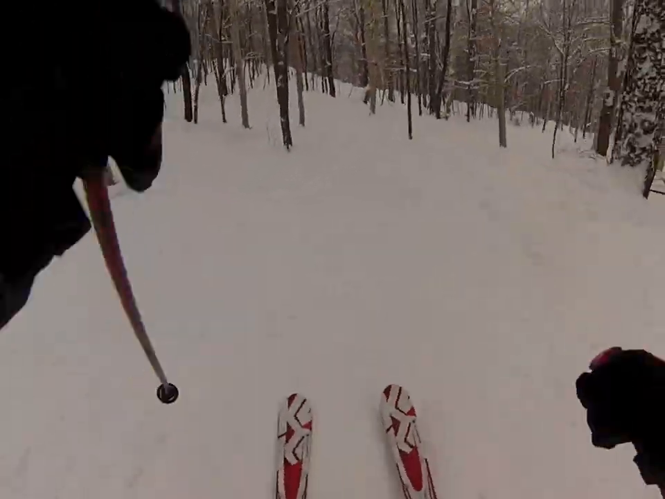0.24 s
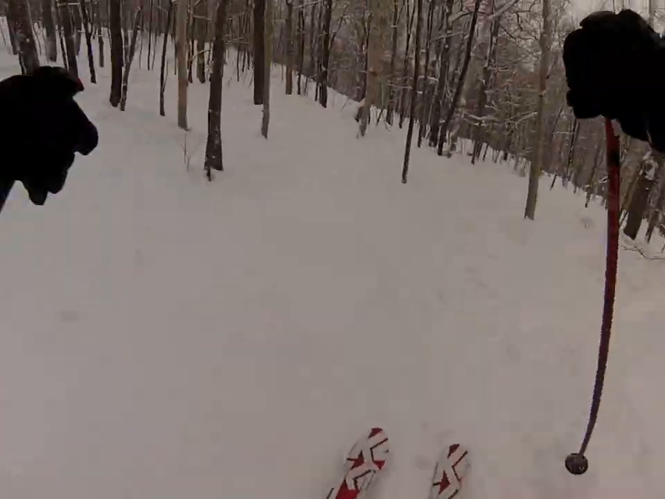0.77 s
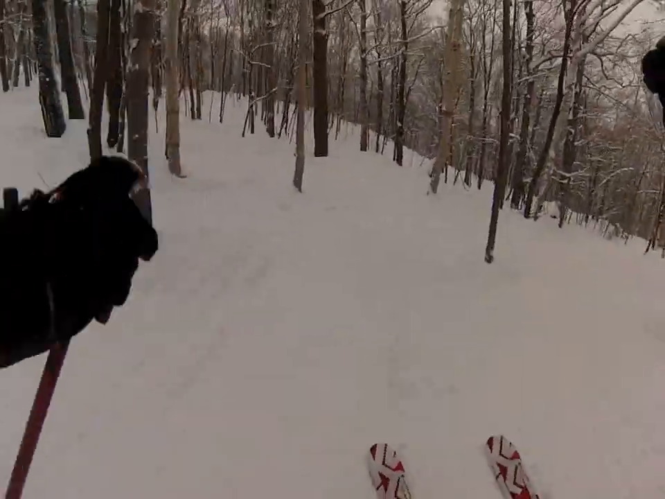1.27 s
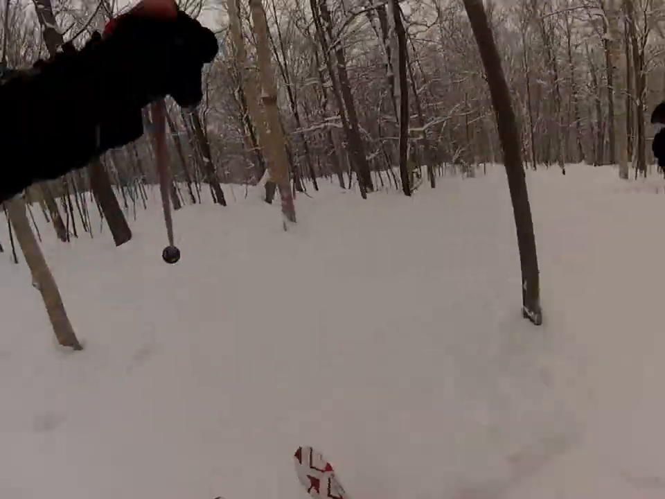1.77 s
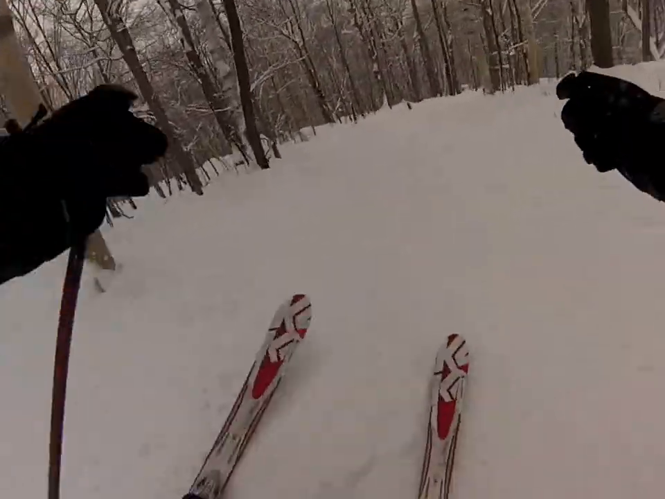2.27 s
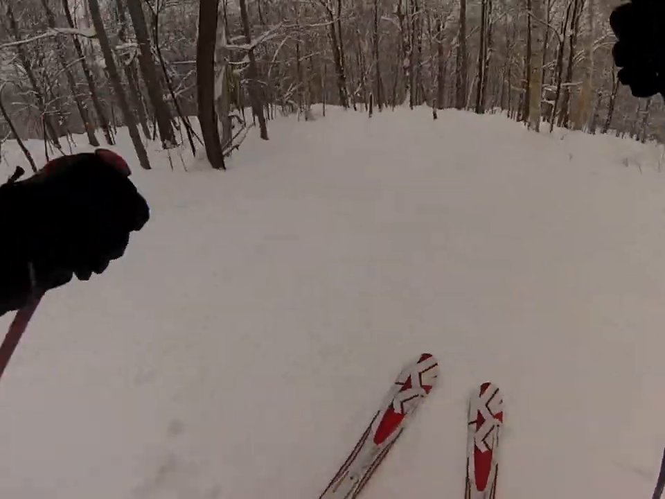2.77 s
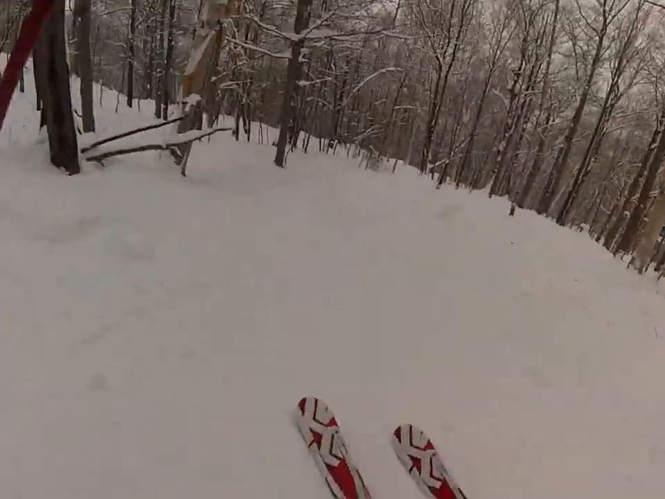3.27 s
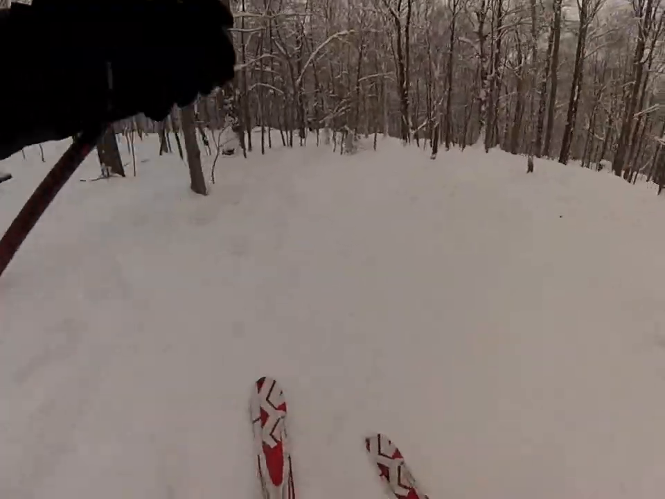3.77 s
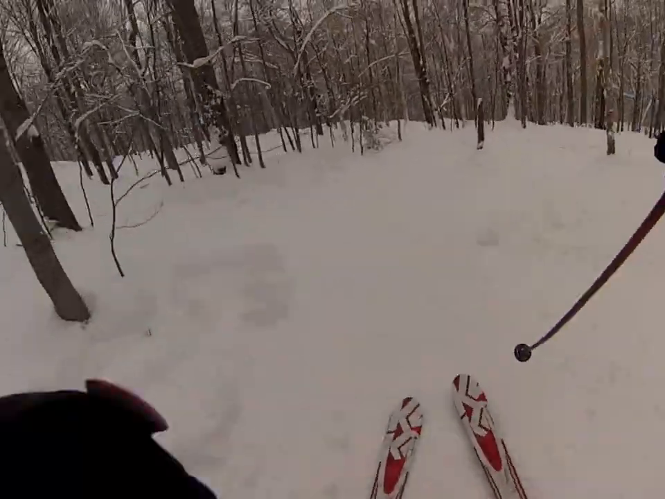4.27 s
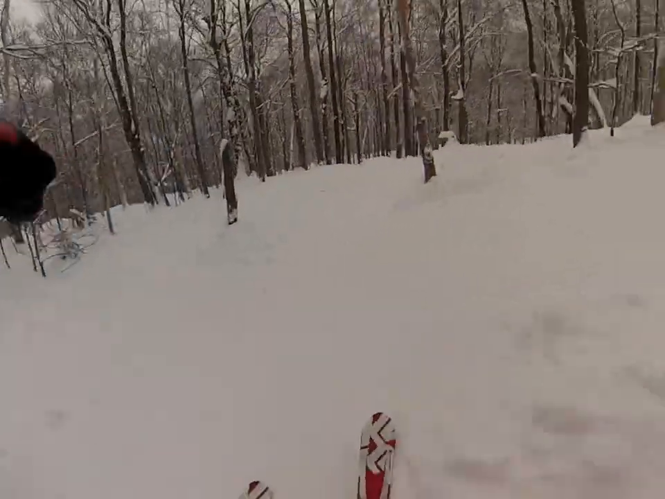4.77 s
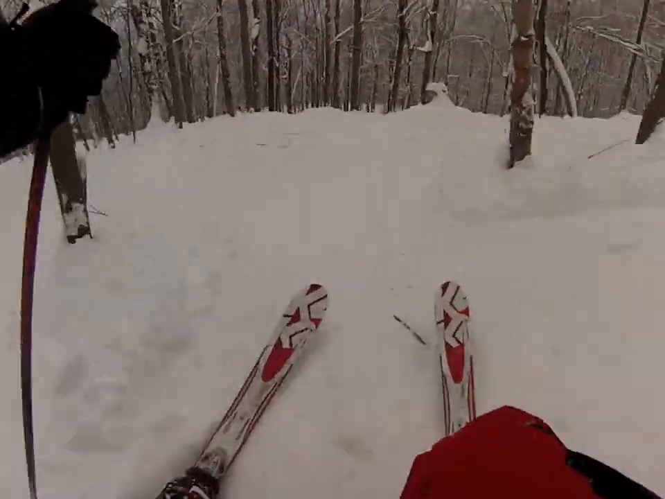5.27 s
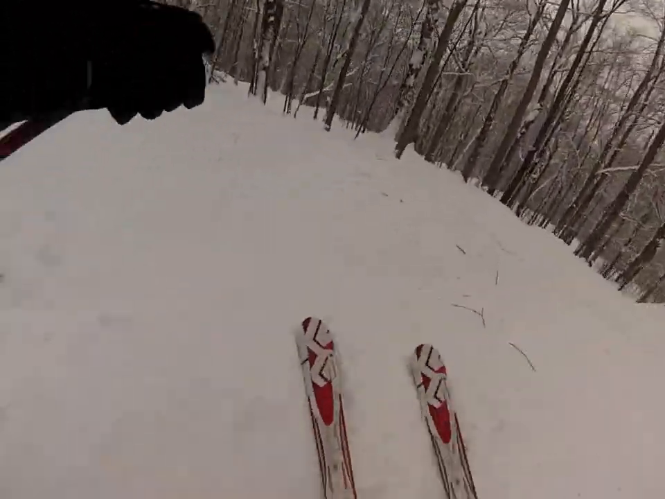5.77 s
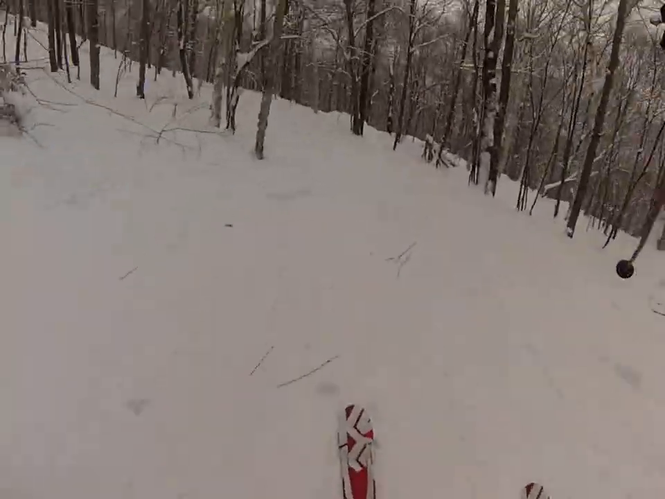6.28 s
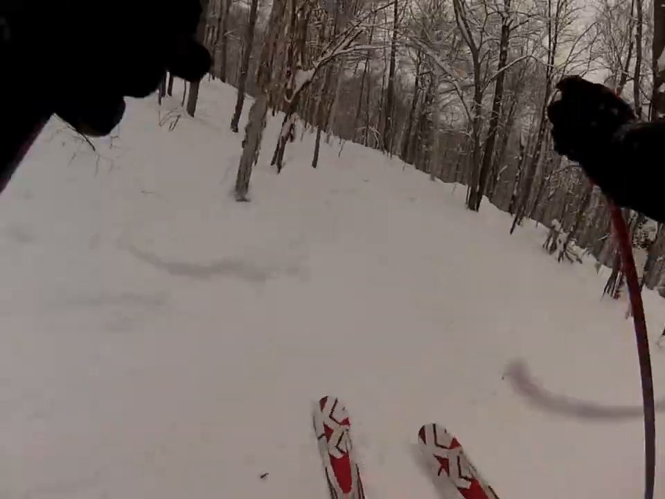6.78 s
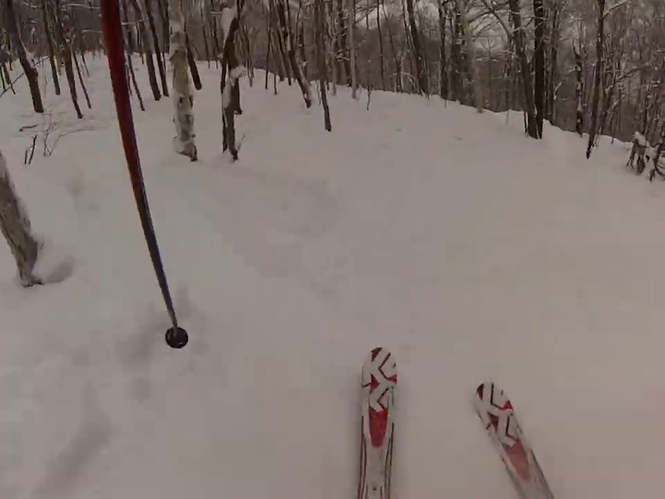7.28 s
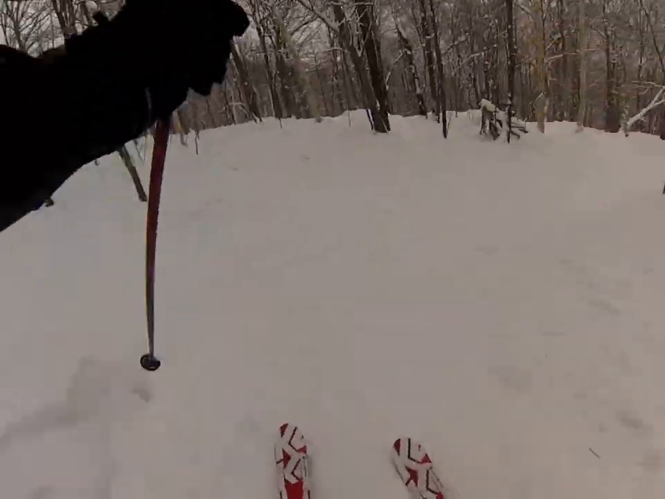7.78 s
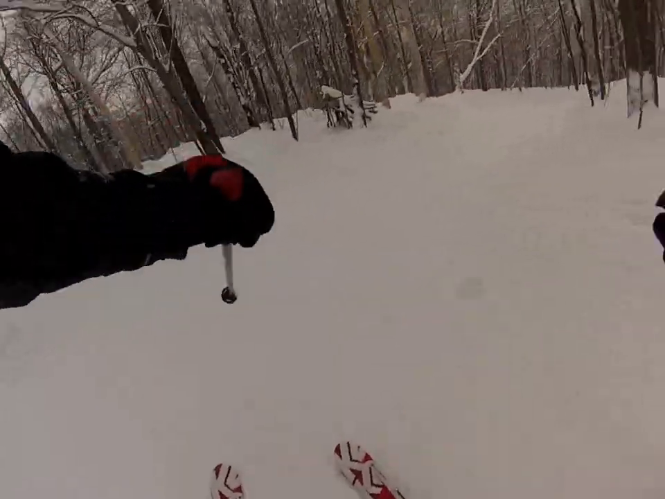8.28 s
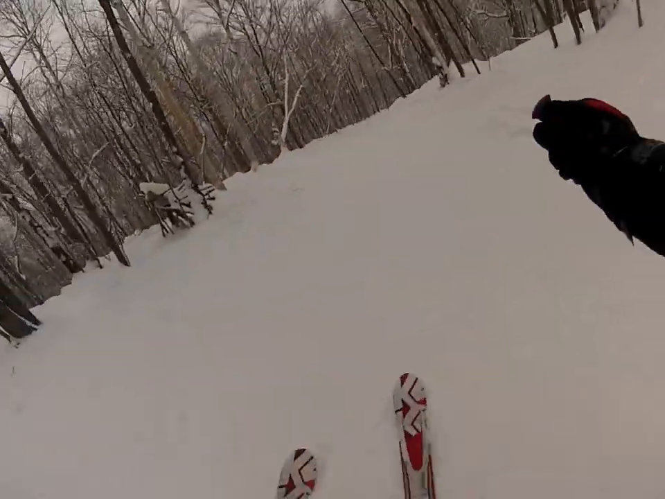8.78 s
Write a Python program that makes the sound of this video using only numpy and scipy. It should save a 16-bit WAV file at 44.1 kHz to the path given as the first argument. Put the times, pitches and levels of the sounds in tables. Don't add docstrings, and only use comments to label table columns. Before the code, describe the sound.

Skis hiss in uneven strokes through soft powder while low thumps and dull plastic knocks jolt a muffled, chest-worn microphone.

```python
import sys
import numpy as np
from scipy import signal
from scipy.fft import rfft, irfft, next_fast_len
from scipy.io import wavfile
from scipy.ndimage import uniform_filter1d, map_coordinates

SR = 44100
rng = np.random.default_rng(int(sys.argv[2]) if len(sys.argv) > 2 else 0)


def gain_from_db(level_db):
    decades = np.asarray(level_db, float) / 20
    return 10 ** decades


def bounce(signal):
    frames = np.transpose(np.atleast_2d(signal))
    limited = np.clip(frames, -1, 1)
    pcm = np.round(limited * 32767).astype(np.int16)
    wavfile.write(sys.argv[1], SR, pcm)


N = 398663


def unit(x):
    return x / np.sqrt(np.mean(x ** 2) + 1e-20)


def along(points, hz):
    f, db = np.transpose(points)
    return gain_from_db(np.interp(np.log(hz + 1), np.log(f + 1), db))


def track(rows):
    s, *columns = np.transpose(rows)
    return [np.interp(np.arange(N) / SR, s, c) for c in columns]


def wobble(rate_hz):
    knots = rng.standard_normal(int(N * rate_hz / SR) + 4)
    return map_coordinates(knots, [np.arange(N) * rate_hz / SR])


def grains(rate_hz, spread_db):
    hit = rng.random(N) < rate_hz / SR
    size = np.minimum(rng.exponential(size=N), 2)
    return unit(hit * rng.choice([-1, 1], N) * gain_from_db(spread_db * size))


def patchy(x, patchy_db):
    z = signal.stft(x, nperseg=512)[2]
    field = uniform_filter1d(rng.standard_normal(z.shape), size=6, axis=0)
    field = uniform_filter1d(field, size=8, axis=1)
    return signal.istft(z * gain_from_db(patchy_db * unit(field)), nperseg=512)[1][:N]


def filtered(x, response):
    m = next_fast_len(N + SR // 2)
    return irfft(rfft(x, m) * response(np.fft.rfftfreq(m, 1 / SR)), m)[:N]


def modes(table):
    def response(f):
        total = 0
        for k, (centre, width, db) in enumerate(table):
            damping = 1j * f * width
            total = total + (-1) ** k * gain_from_db(db) * damping / (centre ** 2 - f ** 2 + damping)
        return total
    return response


def rung(rattle, table):
    n = len(rattle)
    ring = irfft(rfft(rattle) * modes(table)(np.fft.rfftfreq(n, 1 / SR)), n)
    return ring / np.max(np.abs(ring))


def add(out, s, sound):
    at = round(s * SR)
    out[at:at + len(sound)] += sound[:N - at]


def muffled(f, edge_hz=5600):
    return 1 / (1 + 1j * f / edge_hz * 1.154 - (f / edge_hz) ** 2) ** 2


def hollow(f):
    return 1 - 0.55 / (1 + ((f - 2850) / 220) ** 2)


def through_case(f):
    return muffled(f) * hollow(f)


# mid t/s, length/s, level over pressure/dB
STROKES = [(0.117, 0.26, 8.0), (0.576, 0.34, 4.0), (0.681, 0.07, 5.5), (0.801, 0.093, 3.0),
           (0.943, 0.34, 5.5), (1.18, 0.26, 3.0), (1.4, 0.27, 7.5), (1.441, 0.05, 3.5), (1.594, 0.07, 8),
           (1.697, 0.13, 9.5), (1.891, 0.12, 4.5), (2.023, 0.34, 6), (2.028, 0.07, 3.5),
           (2.197, 0.087, 3.5), (2.317, 0.35, 2.5), (2.4, 0.34, 7.5), (2.58, 0.074, 6), (2.674, 0.05, 7),
           (2.814, 0.35, 4.0), (2.816, 0.055, 6), (3.046, 0.36, 2), (3.342, 0.34, 8.0), (3.576, 0.18, 6.5),
           (3.897, 0.091, 3), (4, 0.05, 4.0), (4.18, 0.35, 4.5), (4.198, 0.063, 6.0), (4.447, 0.15, 4),
           (4.608, 0.05, 3), (4.63, 0.31, 6.0), (4.857, 0.22, 1), (4.956, 0.13, 9.5), (5.06, 0.12, 4),
           (5.231, 0.05, 4), (5.246, 0.34, 7.0), (5.396, 0.1, 4.5), (5.582, 0.11, 4), (5.687, 0.07, 9.5),
           (5.879, 0.067, 5.0), (5.904, 0.34, 6.5), (6.097, 0.07, 3), (6.238, 0.076, 4.5), (6.295, 0.23, 3),
           (6.588, 0.18, 6), (6.839, 0.083, 4.5), (7.046, 0.25, 11), (7.056, 0.34, 1), (7.36, 0.35, 5.5),
           (7.47, 0.13, 3.0), (7.752, 0.26, 3.0), (8.009, 0.065, 3.5), (8.009, 0.25, 7.5),
           (8.293, 0.1, 5.0), (8.471, 0.067, 5), (8.532, 0.25, 5.5), (8.852, 0.34, 4.5), (8.92, 0.067, 3)]
# mid t/s, length/s, level over pressure/dB
LULLS = [(0.264, 0.07, -4.5), (0.596, 0.07, -6.0), (0.861, 0.07, -4), (1.03, 0.05, -7), (1.202, 0.05, -6),
         (1.971, 0.07, -7), (2.133, 0.05, -4), (2.305, 0.11, -3.5), (2.329, 0.07, -7), (2.736, 0.05, -7.0),
         (3.029, 0.07, -6), (3.29, 0.07, -4), (3.826, 0.046, -5.0), (4.123, 0.05, -3), (4.27, 0.073, -4.5),
         (4.355, 0.05, -5), (4.716, 0.11, -3), (4.977, 0.046, -4.5), (5.161, 0.073, -8),
         (5.297, 0.042, -6.0), (5.445, 0.05, -3), (5.514, 0.042, -2), (5.814, 0.11, -3.5),
         (5.973, 0.05, -4), (6.29, 0.046, -3), (6.786, 0.07, -3), (6.954, 0.05, -6), (7.046, 0.25, -4.0),
         (7.142, 0.05, -6.0), (7.36, 0.1, -2.5), (7.762, 0.05, -7), (8.089, 0.05, -4.5), (8.226, 0.05, -3),
         (8.354, 0.07, -3), (8.57, 0.07, -3), (8.81, 0.067, -4)]


def strokes(edge_s=0.032):
    t = np.arange(0, N, 64) / SR
    lift_db = np.zeros(len(t))
    for s, length_s, db in STROKES + LULLS:
        inside_s = length_s / 2 - np.abs(t - s)
        lift_db += db * np.clip(inside_s / min(edge_s, length_s / 2), 0, 1)
    return np.interp(np.arange(N) / SR, t, lift_db)


# f/Hz, level/dB per Hz
RUMBLE = [(12, 4.5), (20, 17.5), (142, -10.5), (232, -25), (325, -30), (381, -30), (433, -34.5), (549, -42),
          (900, -45.5), (1170, -38), (1980, -120)]
# t/s, mount sway level/dB, harness rub level/dB
MOTION = [(0.0, -37, -51), (0.6, -37.5, -57.5), (1.1, -39, -49.5), (1.82, -40.5, -56.5), (2.1, -35, -52),
          (2.6, -40.5, -58), (3.07, -40, -55.5), (3.35, -33.5, -44.5), (3.8, -37.5, -54.5),
          (4.5, -41, -52.5), (5.2, -31.5, -46.5), (5.66, -40, -54), (6.15, -37.5, -47.5),
          (7.15, -36.5, -48.5), (7.7, -39.5, -58), (8.0, -42.5, -53.5), (8.25, -49, -69),
          (9.04, -30.5, -41)]


def rumble(shake_db=-24, shake_s=0.037, shake_rub_db=-15.5, rub_follows=0.6):
    sway_db, rub_db = track(MOTION)
    tremble, t = np.zeros(N), np.arange(SR // 2) / SR
    for s, db, *_ in DROPS + LIFTS:
        add(tremble, s, gain_from_db(db + shake_db) * np.exp(-t / shake_s))
    lumps = gain_from_db(2.3 * wobble(16) + 3 * wobble(34))
    shaking = lumps * (rng.standard_normal(N) + 0.56 * grains(45, spread_db=1.5))

    def slow_part(f):
        return 1 / (1 + (f / 120) ** 4)

    sway = filtered(shaking, lambda f: along(RUMBLE, f) * slow_part(f))
    rub = filtered(shaking, lambda f: along(RUMBLE, f) * (1 - slow_part(f)))
    sway_gain = gain_from_db(sway_db) + tremble
    rub_gain = gain_from_db(rub_db + rub_follows * strokes()) + gain_from_db(shake_rub_db) * tremble
    return gain_from_db(1.5) * sway_gain * unit(sway) + gain_from_db(2.0) * rub_gain * unit(rub)


# f/Hz, width/Hz, level/dB
CASE = [(1450, 157, 1.5), (2150, 293, 2), (3540, 340, -13), (4910, 1230, -14)]
# f/Hz, level/dB per Hz
LEAK = [(300, -33), (600, -18), (800, -12), (1000, -19), (1800, -13), (2450, -9), (2850, -25),
        (5000, -35.5), (7000, -56)]


def snow_hiss(hiss_db, puffs):
    crush = [patchy(rng.standard_normal(N) + 0.86 * grains(700, spread_db=6), patchy_db=1.3)
             for _ in range(3)]
    contact_db = np.clip(hiss_db + 44.5, 0, None)
    leak = filtered(crush[1], lambda f: along(LEAK, f))
    wall = filtered(crush[0], modes(CASE[:2])) + gain_from_db(-1.5 - 1.0 * contact_db) * leak
    upper = gain_from_db(0.64 * wobble(18) - 0.14 * contact_db) * filtered(crush[2], modes(CASE[2:]))
    hiss = filtered(gain_from_db(puffs) * wall + gain_from_db(0.68 * puffs) * upper, through_case)
    return gain_from_db(hiss_db + 0.3) * unit(hiss)


# f/Hz, width/Hz, level/dB
SHELL = [(7200, 870, 2), (10950, 1170, -3.5), (12900, 3800, -11)]


def spray(hiss_db, loose_db, puffs):
    spray_db = -64 + 0.66 * (uniform_filter1d(hiss_db, size=SR // 30) + 49.5) + loose_db
    haze_db = np.interp(np.arange(N) / SR, [2.25 - 0.3, 2.25, 2.25 + 0.04], [0, 11, 0])
    fine = patchy(rng.standard_normal(N) + 0.8 * grains(500, spread_db=4.5), patchy_db=2.2)
    shell = gain_from_db(0.4 * puffs + 1.3 * wobble(30)) * filtered(fine, modes(SHELL))
    return gain_from_db(spray_db + haze_db - 2.5) * unit(shell)


# t/s, pressure level/dB, snow looseness level/dB
PRESSURE = [(0.0, -54.5, 0.5), (0.3, -55, -2), (0.8, -58.5, -4), (1.25, -53.5, 2), (1.8, -58.5, -2),
            (2.22, -54, 1.5), (2.64, -58.5, 2), (3.1, -56, 0.5), (3.8, -52.5, 2.5), (4.25, -57.5, 1),
            (4.45, -53.5, 3.5), (5.2, -51, 2), (5.7, -56, -1.5), (6.4, -51, 2), (7.25, -48.5, 6),
            (7.62, -56, -4), (8.36, -61.5, 4), (9.04, -44, 0)]


def glide():
    pressure_db, loose_db = track(PRESSURE)
    hiss_db = pressure_db + strokes()
    puffs = 0.6 * wobble(22) + 1.5 * wobble(65)
    return snow_hiss(hiss_db, puffs) + spray(hiss_db, loose_db, puffs)


# f/Hz, level/dB per Hz
FLOOR = [(180, -41), (300, -14.5), (1240, -16), (1510, -1), (1670, -33), (2140, -9.5), (2790, -17.5),
         (4350, -17.5), (13800, -27.5), (15500, -35)]


def self_noise():
    return gain_from_db(-63.0) * unit(filtered(rng.standard_normal(N), lambda f: along(FLOOR, f)))


def contacts(events, t60_s=0.016, rise_s=0.00023):
    out, t = np.zeros(N), np.arange(2048) / SR
    for s, db, hz, bright_db, hollow_db in events:
        fade_s = t60_s * gain_from_db(0.091 * (db + 27.0))
        envelope = (1 - np.exp(-t / rise_s)) * gain_from_db(-60 * t / fade_s)
        rattle = rng.standard_normal((4, len(t))) * envelope
        spot = [(hz, 520, 0)]
        wall = rung(rung(rattle[0], spot), spot)
        wall = wall + gain_from_db(-5.0) * rung(rung(rattle[3], CASE[:2]), [(1700, 2100, 0)])
        wall = wall + gain_from_db(-13) * rung(rattle[1], [(2300, 4000, 0)])
        upper = rung(rattle[1], [(3600, 420, 5), (5200, 2700, -11)])
        body = rung(rattle[2], [(332, 144, 10.5), (1080, 620, -9.0)])
        blow = gain_from_db(-6) * wall + gain_from_db(bright_db - 0.5) * upper + gain_from_db(hollow_db + 1.0) * body
        add(out, s, gain_from_db(db) * blow)
    return filtered(out, through_case)


# t/s, peak level/dB, struck spot f/Hz
WALL_TAPS = [(0.138, -31, 1970), (0.3554, -29, 1980), (0.5135, -24.5, 2150), (0.528, -35, 2000),
             (0.622, -32, 2100), (0.268, -37, 2050), (4.225, -36, 2100), (1.177, -33, 1480),
             (1.284, -17, 1450), (1.8881, -32, 2200), (1.9066, -27, 1970), (3.2477, -32, 2130),
             (3.3333, -33, 1440), (3.5124, -37, 2000), (3.637, -30, 1450), (4.5258, -13, 1870),
             (4.914, -36.5, 2090), (5.0868, -26, 2250), (5.1991, -33, 1940), (5.2287, -30, 1490),
             (6.0225, -23, 2040), (6.049, -27, 1150), (6.3118, -17.5, 2070), (0.6018, -26, 1920),
             (7.047, -24, 1450), (0.687, -30, 2000), (8.993, -35, 2000), (8.003, -33.5, 2010),
             (8.127, -36, 1410), (8.7492, -36, 2000), (9.0147, -17.5, 1470), (8.983, -18.5, 1120)]


def wall_taps(bright_db=-41.5, hollow_db=-26.5):
    return contacts([(s, db, hz, bright_db, hollow_db) for s, db, hz in WALL_TAPS])


def clicks(events, t60_s=0.0044):
    ring, snaps, t = np.zeros(N), np.zeros(N), np.arange(SR // 100) / SR
    for s, db, hz in events:
        fade = gain_from_db(db - 60 * t / t60_s) * (1 - np.exp(-t / 0.00013))
        add(ring, s, gain_from_db(-0.5) * fade * np.sin(2 * np.pi * hz * t))
        add(snaps, s, gain_from_db(5) * fade * rng.standard_normal(len(t)))
    return ring + filtered(snaps, modes(SHELL))


# t/s, peak level/dB, pitch f/Hz
CRUMBS = [(0.194, -47, 6720), (0.304, -38, 6400), (0.3925, -45, 7540), (0.6062, -36, 6150),
          (0.874, -42, 7000), (1.073, -40, 7500), (1.1089, -44, 6300), (1.286, -40, 6500),
          (1.469, -30, 5000), (2.3974, -44, 7480), (2.4473, -48, 6440), (2.5596, -47, 6000),
          (2.5723, -36, 5000), (2.764, -41, 5800), (2.85, -42, 7500), (3.3932, -46, 7580),
          (3.8407, -35.5, 7300), (4.3263, -35.5, 6400), (4.494, -41, 7400), (4.5266, -35, 7040),
          (4.6354, -46, 7300), (5.68, -40, 7600), (5.811, -38, 7200), (6.2185, -43, 6010),
          (6.655, -41, 6700), (6.843, -33, 7200), (4.654, -46, 7400), (5.748, -45, 7200),
          (2.932, -44, 4600), (6.981, -42, 7200), (7.7002, -41, 7510), (8.104, -38, 7300),
          (8.557, -46, 7510)]


def crumbs():
    return clicks(CRUMBS)


def swings(events, way, knock_hz=125):
    out, t = np.zeros(N), np.arange(SR // 8) / SR
    for s, db, hz, knock_db in events:
        turn = t * hz * 0.93
        rap = t * knock_hz * np.exp(0.29 * rng.standard_normal())
        sway = gain_from_db(-24 * turn) * np.sin(2 * np.pi * turn)
        knock = gain_from_db(knock_db + 9.0 - 9.9 * rap) * np.sin(2 * np.pi * rap)
        add(out, s, way * gain_from_db(db + 6.0) * (sway + knock) * (1 - np.exp(-t / 0.0012)))
    return out


# t/s, peak level/dB, sway f/Hz, knock level over sway/dB
DROPS = [(0.214, -29, 90, -16), (0.602, -10, 46, -16.5), (1.268, -23.5, 42, -14.5), (1.37, -17.5, 21, -27),
         (1.608, -19.5, 33, -22), (1.724, -17.5, 29, -25), (2.374, -12, 37, -25), (2.4, -10.5, 46, -31),
         (2.758, -26, 27, -25), (3.557, -12.5, 36, -25), (3.684, -14.5, 41, -24.5), (4.523, -6.5, 42, -29),
         (4.543, -19, 105, -12), (4.566, -18.5, 36, -25), (4.62, -12, 48, -22), (4.95, -14.5, 19, -34),
         (5.07, -10.5, 28, -25), (5.268, -22, 35, -23), (5.419, -37.5, 77, 3.5), (6.654, -24, 110, -16),
         (8.772, -22, 13, -27), (8.997, -24, 110, -14), (5.131, -18, 24, -30), (7.42, -28, 30, -20)]


def drops():
    return swings(DROPS, way=-1)


def crunch(level_db=-33, t60_s=0.06):
    burst, t = np.zeros(N), np.arange(SR // 8) / SR
    for s, db, *_ in DROPS + LIFTS + SHUDDERS:
        add(burst, s, gain_from_db(db + level_db - 60 * t / t60_s) * (1 - np.exp(-t / 0.002)))
    grit = rng.standard_normal(N) + grains(400, spread_db=5)
    hollow_pad = modes([(340, 300, 0)])
    return burst * unit(filtered(grit, lambda f: hollow_pad(f) ** 2))


# t/s, peak level/dB, f/Hz, way (up 1, down -1)
JERKS = [(0.217, -23, 130, 1), (0.612, -14, 130, -1), (1.419, -21, 119, -1), (2.255, -29, 140, -1),
         (2.401, -12.5, 109, -1), (3.467, -28, 150, 1), (3.677, -28, 130, -1), (4.556, -16, 90, 1),
         (5.043, -11.5, 115, -1), (5.589, -20, 120, -1), (5.924, -18, 110, -1), (6.093, -28, 150, 1),
         (6.165, -30, 140, 1), (6.657, -15.5, 75, 1), (6.772, -21.5, 150, -1), (3.227, -27, 150, 1),
         (7.627, -29.5, 90, 1)]


def jerks(loss_db_per_cycle=16):
    out, t = np.zeros(N), np.arange(SR // 8) / SR
    for s, db, hz, way in JERKS:
        fade = gain_from_db(db + 3.5 - loss_db_per_cycle * t * hz) * (1 - np.exp(-t / 0.00088))
        add(out, s, way * fade * np.sin(2 * np.pi * hz * t))
    return out


# t/s, peak level/dB, struck spot f/Hz, bright part level/dB
RIM_CLICKS = [(1.109, -27, 1500, -15), (1.469, -27, 1900, -8), (2.446, -25, 1500, -2),
              (2.5396, -30, 1500, -15), (2.571, -34, 1400, -8), (2.799, -32.5, 1400, -16),
              (3.1393, -36, 2050, -11), (3.842, -26.5, 1630, -11.5), (6.609, -31, 2160, -12),
              (6.842, -13.5, 2220, -13), (6.884, -31, 2100, 3.5), (5.9, -41, 2130, -1),
              (7.0778, -28, 1470, -10), (7.1114, -30, 2100, -6), (7.196, -34.5, 2170, -9),
              (7.4849, -32, 2050, -18), (7.5677, -34, 3550, -8), (5.585, -21.5, 2570, -14),
              (4.718, -42.5, 2100, 3.5), (4.538, -40, 2100, 7), (4.666, -43.5, 2000, 4.5),
              (0.313, -42, 1700, 1), (3.185, -43, 1800, -1), (4.325, -46.5, 2400, 5),
              (3.091, -41, 2100, -3.5), (8.104, -51, 2100, 7), (6.2175, -31, 1300, -4.5),
              (2.764, -43, 2100, 3.5)]


def rim_clicks(hollow_db=-30):
    return contacts([(s, db, hz, bright_db, hollow_db) for s, db, hz, bright_db in RIM_CLICKS])


# t/s, peak level/dB, struck spot f/Hz, hollow part level/dB
BODY_KNOCKS = [(0.6075, -13, 1720, -15.5), (1.1493, -34, 1890, -15), (1.5005, -28, 2030, -2.5),
               (2.4009, -33, 940, -16), (2.5593, -35.5, 1070, -7), (4.1994, -46, 1990, -2),
               (4.5394, -39, 923, -6), (4.6198, -22, 1450, -18), (5.045, -25.5, 1510, -8),
               (5.4194, -35.5, 1890, -4), (5.5688, -26.5, 1810, -10), (5.584, -13, 1200, -5),
               (5.587, -25, 1080, 1.5), (5.6697, -37, 2077, -12), (5.9898, -38.5, 1990, 7),
               (6.2173, -27, 2200, -8.5), (6.6528, -35, 1440, -24), (6.77, -28, 1790, -11),
               (8.9824, -17, 2210, -20), (9.0095, -28.5, 1900, 4)]


def body_knocks(bright_db=-50):
    return contacts([(s, db, hz, bright_db - db, hollow_db) for s, db, hz, hollow_db in BODY_KNOCKS])


# t/s, peak level/dB, sway f/Hz, knock level over sway/dB
LIFTS = [(0.616, -13, 30, -19.5), (1.424, -14.5, 27.2, -16), (1.5, -7.5, 38.4, -31),
         (2.454, -12, 29.1, -25), (2.555, -10.5, 29.6, -26.5), (3.422, -7.5, 45, -35),
         (3.489, -14, 27, -19), (3.61, -13, 35.2, -25), (5.084, -22, 15, -20), (5.194, -16.5, 27, -23.5),
         (5.287, -20, 50, -25), (5.338, -20.5, 34.8, -37), (5.915, -23.5, 59.6, -14.5),
         (5.95, -13.5, 30, -27), (7.188, -24.5, 23.8, -24), (8.916, -26, 27, -17), (9.008, -25.5, 64.6, -2),
         (9.03, -20, 29.6, -15)]


def lifts():
    return swings(LIFTS, way=1)


# t/s, peak level/dB, pitch f/Hz
PELTING = [(2.0752, -46, 13000), (2.1095, -48, 10900), (2.1154, -49, 12500), (2.1234, -47, 11500),
           (2.1515, -44, 13520), (2.165, -35, 6760), (2.186, -40, 12500), (2.212, -38, 11000),
           (2.2154, -32, 6760), (2.2258, -33, 7500), (2.2395, -23.5, 11300), (2.26, -39, 12500),
           (2.0006, -52, 11000), (2.251, -44, 9000), (2.267, -44, 6000), (2.2, -47, 12000),
           (1.805, -44, 12000), (1.862, -45, 11000), (1.533, -43, 12000), (3.855, -40, 9100),
           (4.2467, -50, 9000)]


def pelting():
    return clicks(PELTING)


# t/s, peak level/dB, f/Hz, length/s
SHUDDERS = [
    (5.963, -17, 145, 0.046),
    (2.532, -11.5, 80.5, 0.022),
    (5.049, -21, 129, 0.0206),
    (5.581, -17, 209, 0.01175),
    (6.307, -13, 110, 0.013),
]


def shudders():
    out = np.zeros(N)
    for s, db, hz, length_s in SHUDDERS:
        t = np.arange(round(length_s * SR)) / SR
        turn = hz * t * (0.64 + 0.3 * t / length_s)
        add(out, s, gain_from_db(db) * np.sin(np.pi * t / length_s) * np.sin(2 * np.pi * turn))
    return out


# t/s, peak level/dB, pitch f/Hz
FLECKS = [(2.7421, -59, 10400), (2.764, -54, 9990), (3.0079, -56, 11700), (3.1401, -53, 10600),
          (3.2379, -56, 9650), (3.3277, -54, 10500), (3.8416, -47, 10200), (4.1424, -58, 10200),
          (4.2466, -56, 9550), (4.3255, -47, 9800), (4.3694, -53, 10000), (4.527, -49, 10600),
          (4.7051, -57, 10700), (4.8168, -51, 10000), (4.8797, -46, 10900), (4.9934, -53, 11500),
          (5.1391, -51, 11300), (5.2364, -50, 9810), (5.2469, -50, 10600), (5.41, -54, 10200),
          (5.5157, -53, 10600), (5.6839, -55, 10900), (5.8181, -51, 11100), (6.3169, -47, 10700),
          (6.3469, -56, 11500), (6.4581, -52, 9580), (6.5898, -50, 11100), (6.6856, -55, 11100),
          (6.7115, -56, 9600), (6.8417, -52, 9710), (7.9512, -55, 10800), (7.9846, -57, 11000),
          (8.0625, -57, 11200), (8.1029, -47, 11000), (8.4147, -55, 11500), (8.4501, -56, 9920),
          (8.5563, -54, 11000), (8.8312, -54, 10500), (8.8936, -51, 11300), (8.9849, -54, 10700)]


def flecks():
    return clicks(FLECKS)


# start t/s, length/s, level/dB, low mode over high/dB
SCRAPES = [
    (6.93, .25, -39, 3.5),
    (7.2, 0.078, -45, 6.5),
    (4.75, 0.048, -50.5, -14),
    (3.84, 0.025, -41.5, 3),
]


def scrapes():
    t = np.arange(N) / SR
    sung = []
    for hz, width_hz, _ in CASE[:2]:
        slips = gain_from_db(1.5 * wobble(60)) * (rng.standard_normal(N) + grains(300, spread_db=5))
        sung.append(unit(filtered(slips, modes([(hz, 0.43 * width_hz, 0)]))))
    low, high = sung
    out = np.zeros(N)
    for s, length_s, db, low_db in SCRAPES:
        inside_s = np.minimum(t - s, s + length_s - t)
        press = np.clip(inside_s / (0.36 * length_s), 0, 1)
        out += gain_from_db(db) * press * (gain_from_db(low_db / 2) * low + gain_from_db(-low_db / 2) * high)
    return filtered(out, lambda f: muffled(f, edge_hz=2650))


def scene():
    body = rumble() + drops() + crunch() + jerks() + lifts() + shudders()
    case = wall_taps() + rim_clicks() + body_knocks() + scrapes()
    snow = glide() + crumbs() + pelting() + flecks()
    return (body + case + snow)[None]


def roll_off(x):
    return signal.sosfilt(signal.butter(12, 16400, fs=SR, output="sos"), x)


def record(dry, low_hz=14, top_hz=15280):
    heard = dry[0] + self_noise()
    kept = filtered(heard, lambda f: 1j * f / (low_hz + 1j * f) * (f < top_hz))
    return roll_off(kept[None])


dry = scene()
out = record(dry)
bounce(out)
```